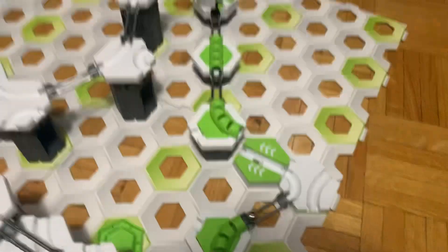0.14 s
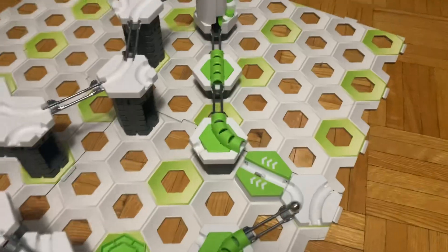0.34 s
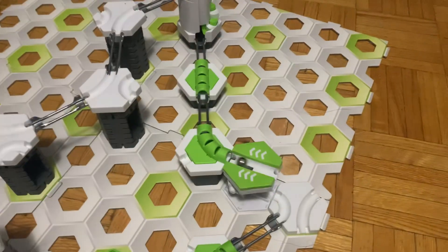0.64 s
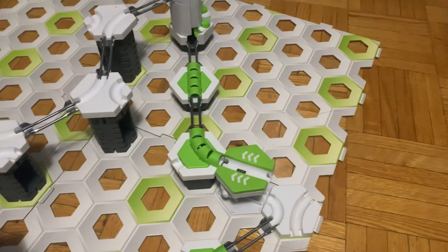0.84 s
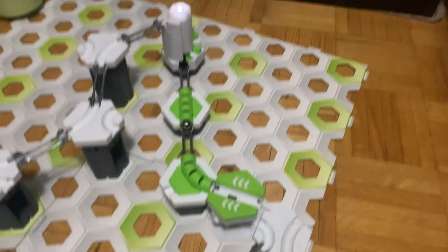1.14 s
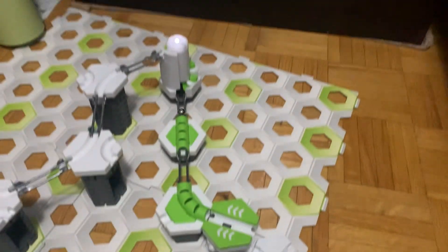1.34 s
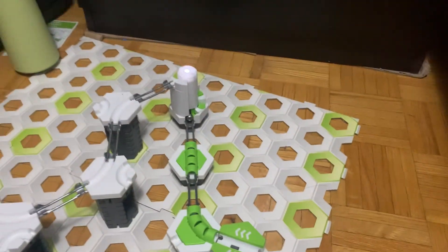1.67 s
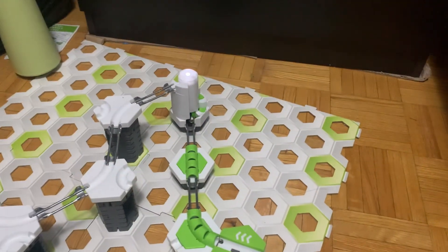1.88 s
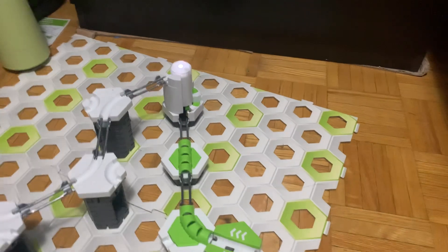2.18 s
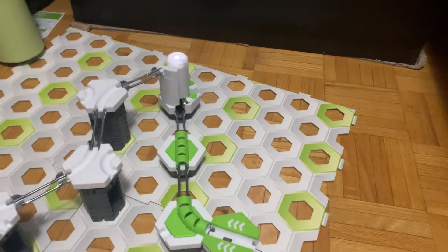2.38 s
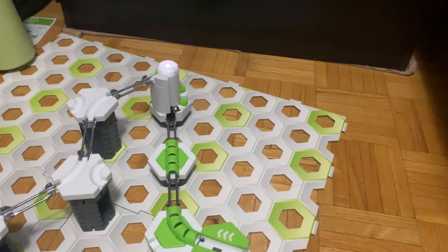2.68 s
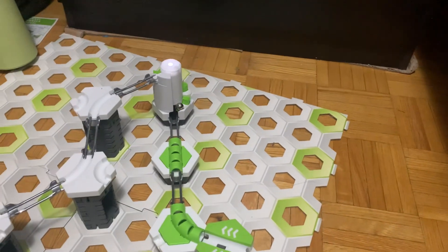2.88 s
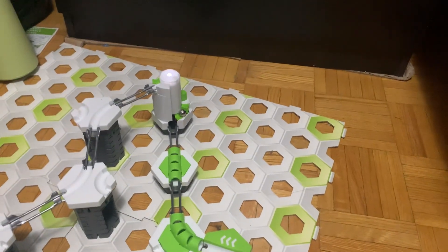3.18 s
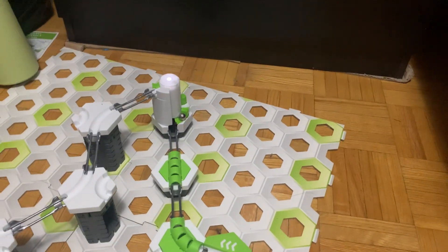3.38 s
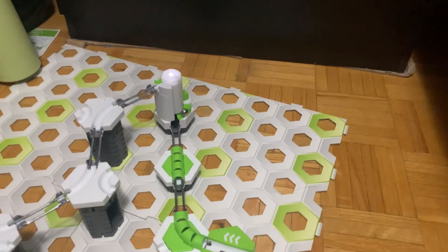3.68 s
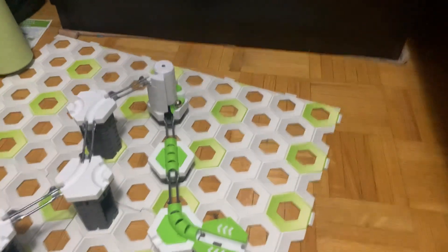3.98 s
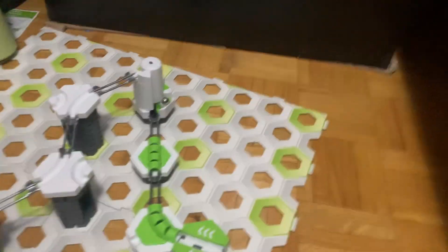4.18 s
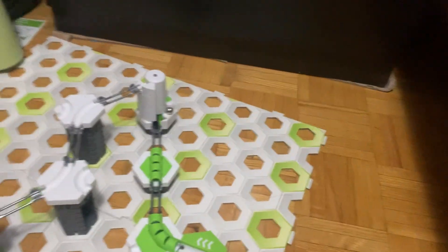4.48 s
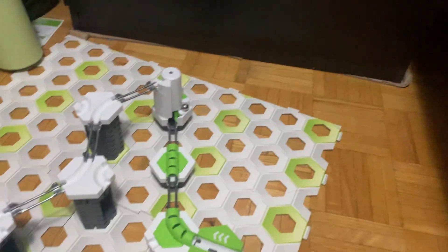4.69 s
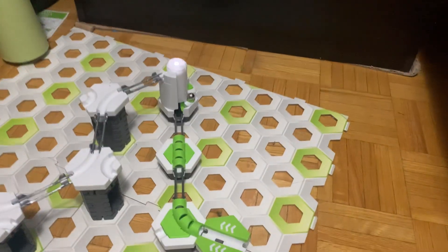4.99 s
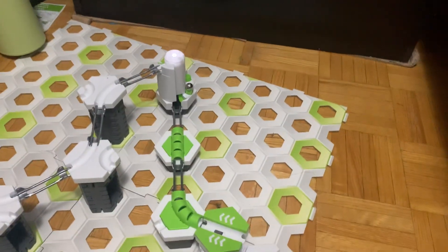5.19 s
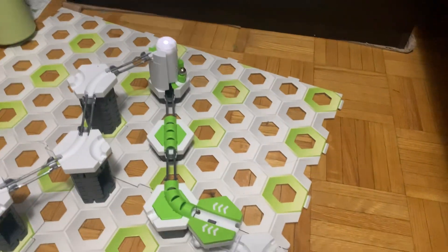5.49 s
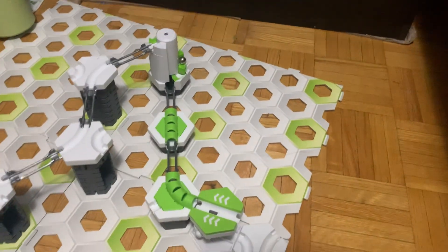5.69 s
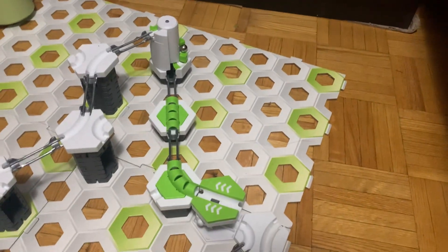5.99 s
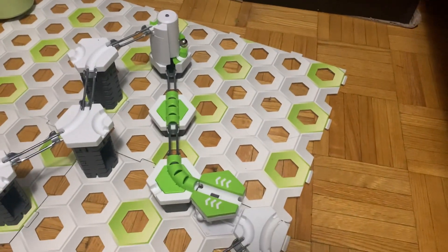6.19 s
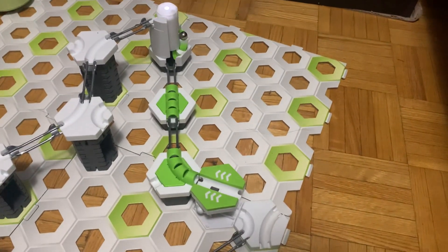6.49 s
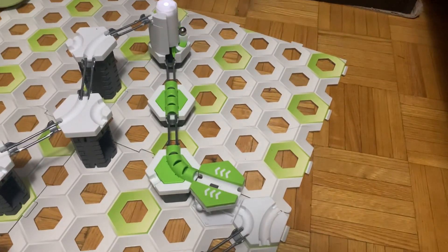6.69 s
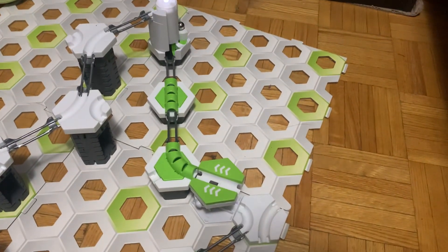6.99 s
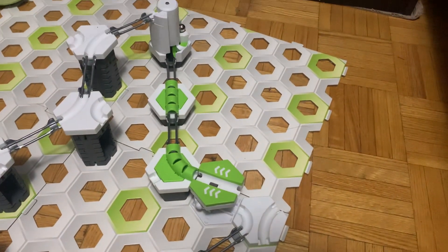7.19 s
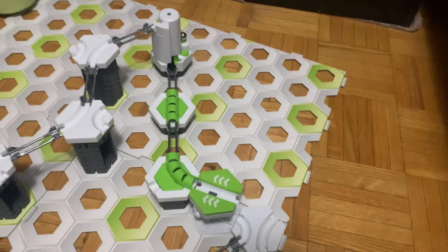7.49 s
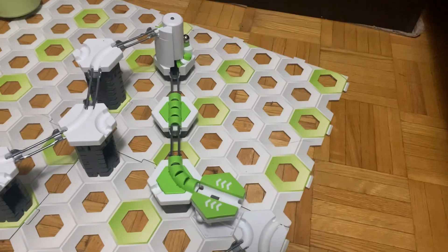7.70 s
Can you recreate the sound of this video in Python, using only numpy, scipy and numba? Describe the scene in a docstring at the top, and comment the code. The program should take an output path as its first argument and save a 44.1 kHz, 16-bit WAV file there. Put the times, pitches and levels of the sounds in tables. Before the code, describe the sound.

A steel marble rattles and clicks along a plastic toy track, knocks into a small motorized lift, which then whirs and scrapes with soft periodic knocks.

```python
"""A quiet living room with a parquet floor, heard through two spaced, hand-held microphones.
A steel marble clicks and rolls along a plastic toy track: chance noise bursts and decaying modes.
It drops into a small battery lift, whose geared motor whirs on: a comb of gear lines and scraping
noise through resonances, slowing under each stroke. The lift knocks softly as the marbles are
pushed up; soft rustles of handling and a low room rumble lie around it."""
import sys
import numpy as np
from scipy import signal
from scipy.fft import rfft, irfft, next_fast_len
from scipy.io import wavfile
from numba import njit

SR = 44100
rng = np.random.default_rng(int(sys.argv[2]) if len(sys.argv) > 2 else 0)


def store_wav(level_fs):
    """Save 16-bit WAV to argv[1]."""
    pcm = np.round(np.clip(np.atleast_2d(level_fs), -1, 1) * 32767)
    wavfile.write(sys.argv[1], SR, pcm.T.astype(np.int16))


N = 345713
TIME = np.arange(N) / SR
# Table levels are relative where the function trims them or levels a whole spectrum to unit rms.


def from_db(db):
    """Decibels to gain."""
    return 10 ** (np.asarray(db) / 20)


def rms_one(x):
    """Scale to unit rms."""
    return x / np.sqrt(np.mean(x ** 2) + 1e-20)


def in_time(rows):
    """Each column of a time table, joined by straight lines."""
    start_s, *columns = np.transpose(rows)
    return [np.interp(TIME, start_s, column) for column in columns]


def gains(points, hz):
    """A spectrum table read as gains on a log-frequency axis."""
    knots_hz, db = np.transpose(points)
    return from_db(np.interp(np.log(hz + 1e-3), np.log(knots_hz), db))


def coloured(x, points):
    """Give a signal the colour of a spectrum table."""
    length = x.shape[-1]
    size = next_fast_len(length)
    hz = np.fft.rfftfreq(size, 1 / SR)
    return irfft(rfft(x, size) * gains(points, hz), size)[..., :length]


def drift(rate):
    """Slow chance curve: normal random knots, rate of them a second, joined by straight lines."""
    knots = rng.standard_normal(int(rate * N / SR) + 2)
    return np.interp(TIME * rate, np.arange(len(knots)), knots)


def swells(rows):
    """Gain of bell-shaped swells, each as long as its length at half height."""
    return sum(from_db(db) * .5 ** ((2 * (TIME - top_s) / length_s) ** 2) for top_s, length_s, db in rows)


def add(out, s, sound):
    """Mix a short sound in at time s."""
    at = max(round(s * SR), 0)
    out[..., at:at + sound.shape[-1]] += sound[..., :N - at]


def struck(modes, age, spread_db):
    """Decaying modes of chance strength and alternating sign; the squared strengths sum to 1."""
    hz, db, t60 = np.transpose(modes)[:, :, None]
    strength = from_db(db + spread_db * rng.standard_normal(hz.shape))
    sign = (-1) ** np.arange(len(hz))[:, None]
    ringing = np.sin(2 * np.pi * hz * age) * from_db(-60 * age / t60)
    return np.sum(sign * strength * ringing, 0) / np.linalg.norm(strength)


def crack(spectrum, age, t60, rise_s):
    """Countless close modes, as coloured noise that swells and dies within milliseconds."""
    swell = 1 - np.exp(-age / rise_s)
    return rms_one(coloured(rng.standard_normal(len(age)), spectrum)) * swell * from_db(-60 * age / t60)


def resonating(x, hz, width_hz):
    """Noise through a fixed resonance with steep skirts; rms 1."""
    edges = np.clip([hz - width_hz / 2, hz + width_hz / 2], 20, .45 * SR)
    return rms_one(signal.sosfilt(signal.butter(2, edges, "band", fs=SR, output="sos"), x))


@njit
def moving_resonance(x, angle, r):
    """Two-pole band-pass whose centre moves."""
    y = np.zeros(len(x))
    for i in range(2, len(x)):
        y[i] = x[i] - x[i - 2] + 2 * r * np.cos(angle[i]) * y[i - 1] - r * r * y[i - 2]
    return y


def singing(noise, hz, width_hz):
    """Rubbing noise twice through a moving resonance, for steep skirts; rms 1."""
    angle, r = 2 * np.pi * hz / SR, np.exp(-np.pi * width_hz / SR)
    return rms_one(moving_resonance(moving_resonance(noise, angle, r), angle, r))


# rumble of the house: pitch_hz [Hz], level_db [dB per Hz]
ROOM_SPECTRUM = [(20, -4), (35, -12), (50, 8.5), (75, 7), (110, -2), (150, -1), (210, -16.5), (310, -13.5),
                 (430, -18.5), (600, -29), (2000, -21.5), (7000, -102), (16000, -63)]
# faint steady hum: pitch_hz [Hz], level_db [dB rms]
HUM_TONES = [(50, -99), (146, -78)]
# the rumble is stronger at first and settles between these two times [s]
RUMBLE_SETTLES_S = (2.2, 2.8)
RUMBLE_EARLY_DB, RUMBLE_LATE_DB = -63, -64


def room_tone(side_db=-11):
    """Low rumble of the house as wide coloured noise, with a faint hum of steady tones."""
    room_db = np.interp(TIME, RUMBLE_SETTLES_S, [RUMBLE_EARLY_DB, RUMBLE_LATE_DB])
    mid, side = rms_one(coloured(rng.standard_normal((2, N)), ROOM_SPECTRUM))
    rumble = mid + from_db(side_db) * side * np.array([[1], [-1]])
    hum = sum(np.sqrt(2) * from_db(db) * np.sin(2 * np.pi * hz * TIME) for hz, db in HUM_TONES)
    return from_db(room_db) * rumble + hum


# the two microphones hear the track unequally: pitch_hz [Hz], left_over_right_db [dB]
MICROPHONE_BALANCE = [(200, 1), (450, -3), (750, -1), (1000, 2.5), (1500, -1), (3000, -1.5), (4300, -3),
                      (5400, -8.5), (6800, -0.5), (16000, 0.5)]
# lead of the left microphone, shaped by the case between the two: pitch_hz [Hz], phase [radians]
LEFT_MICROPHONE_LEAD = [(300, 0), (1000, .9), (1400, -.6), (2000, -.2), (2600, 2.4), (3000, 3.1),
                        (3600, 4.9), (4300, 6.3), (5250, 4.4), (6500, 6.2), (7100, 5.5), (7900, 3.4),
                        (8700, 3), (10700, 0), (11300, -.2), (13400, -3.1), (15400, -6.3)]
# reverberation against the direct sound: pitch_hz [Hz], level_db [dB]
ECHO_SPECTRUM = [(200, 5.5), (1000, 0.5), (2000, -2.5), (4500, -2.5), (7000, -7), (10000, -56.5),
                 (16000, -8)]
ROOM_T60_S = 0.14


def living_room(x, first_echo_s=.003):
    """The direct sound reaches two spaced microphones; a diffuse tail follows, different on each side."""
    age = np.arange(SR // 2) / SR
    tail = rng.standard_normal((2, len(age))) * from_db(-60 * age / ROOM_T60_S) * (age > first_echo_s)
    tail = coloured(tail / np.linalg.norm(tail, axis=1, keepdims=True), ECHO_SPECTRUM)
    size = next_fast_len(N + SR)
    hz = np.fft.rfftfreq(size, 1 / SR)
    lead = np.interp(hz, *np.transpose(LEFT_MICROPHONE_LEAD))
    direct = np.exp(1j * lead * np.array([[1], [0]]))
    balance = gains(MICROPHONE_BALANCE, hz) ** np.array([[.5], [-.5]])
    return irfft(rfft(x, size) * (direct + rfft(tail, size)) * balance, size)[:, :N]


# the holder's hand jostles the microphones: top_s [s], length_s [s], level_db [dB]
JOSTLES = [(0.1, 0.18, -58.5), (1.2, 0.31, -62), (1.7, 0.75, -61), (2.15, .25, -61)]
# colour of the jostling: pitch_hz [Hz], level_db [dB per Hz]
JOSTLE_SPECTRUM = [(15, -5), (30, -2), (48, 13), (80, -8), (160, -23), (400, -53)]


def jostling(rough_db=3):
    """Lumpy low rumble carried through the hand to both microphones."""
    rumble = rms_one(coloured(rng.standard_normal(N), JOSTLE_SPECTRUM))
    return swells(JOSTLES) * from_db(rough_db * drift(6.6)) * rumble


# soft low rustles of handling: top_s [s], length_s [s], level_db [dB]
RUSTLES = [(0.12, 0.099, -70), (1.92, 0.057, -65.5), (2.14, 0.21, -64), (2.38, 0.13, -61.5),
           (2.83, 0.11, -68), (3.55, 0.37, -70.5), (4.03, 0.16, -59.5), (4.57, 0.25, -59.5),
           (5.15, 0.37, -69), (6.02, 0.15, -61)]
# colour of the rustles: pitch_hz [Hz], level_db [dB per Hz]
RUSTLE_SPECTRUM = [(150, -6.5), (230, -8.5), (285, -6), (450, 2), (700, -14), (1300, -4), (2500, -9.5),
                   (6000, -62)]
# faint hollow drone among them: top_s [s], length_s [s], level_db [dB]
DRONES = [(6.15, .45, -71)]
DRONE_HZ, DRONE_WIDTH_HZ = 298, 64


def handling(trim_db=-3, rough_db=3):
    """Soft uneven rustles of noise swell and fade close by, once with a hollow drone."""
    noise = rng.standard_normal(N)
    drone = swells(DRONES) * resonating(noise, DRONE_HZ, DRONE_WIDTH_HZ)
    rustle = rms_one(coloured(noise, RUSTLE_SPECTRUM))
    return drone + swells(RUSTLES) * from_db(trim_db + rough_db * drift(30)) * rustle


# the lift repeats a cycle of two strokes, each beginning with the piston running free: start_s [s]
CYCLE_STARTS_S = [-0.47, 1.967, 4.403, 6.916, 9.45]


def in_cycle(rows):
    """Each column of a table over one lift cycle, repeated for every cycle."""
    cycles = np.interp(TIME, CYCLE_STARTS_S, np.arange(len(CYCLE_STARTS_S)))
    share, *columns = np.transpose(rows)
    return [np.interp(cycles, share, column, period=1) for column in columns]


def meshing(turns, repeating, size=4096):
    """Scraping of gear teeth: one share of its power repeats every turn, the rest is chance."""
    bins = size // 2 + 1
    lines = np.exp(2j * np.pi * rng.random(bins)) * (np.arange(bins) < size // 32)
    pattern = np.interp(turns, np.arange(size) / size, rms_one(irfft(lines)), period=1)
    return np.sqrt(repeating) * pattern + np.sqrt(1 - repeating) * rng.standard_normal(N)


# strong gear lines: multiple of the turning rate [ratio], level_db [dB rms]
GEAR_LINES = [(14, -82), (15, -80.5), (16, -78), (18, -77.5), (20, -82), (21, -74.5), (22, -78), (24, -80),
              (26, -74.5), (28, -73), (30, -88), (32, -69), (34, -66.5), (36, -73.5), (37, -70.5),
              (38, -83), (42, -67.5), (46, -70), (48, -62), (53, -64), (55, -79)]


def gear_whine(turns, weak_line_db=-85, size=4096):
    """The teeth repeat the same pattern on every turn: a comb of lines, a few of them strong."""
    lines = np.zeros(size // 2 + 1)
    lines[19:90] = from_db(weak_line_db)
    for multiple, db in GEAR_LINES:
        lines[round(multiple)] = from_db(db)
    phases = np.exp(2j * np.pi * rng.random(len(lines)))
    one_turn = irfft(lines * phases) * size / np.sqrt(2)
    return np.interp(turns, np.arange(size) / size, one_turn, period=1)


# broad brush hiss: pitch_hz [Hz], level_db [dB per Hz]
BRUSH_SPECTRUM = [(6500, 2), (7800, -25), (8500, 0), (9100, -1), (9600, 23), (10800, 17.5), (11900, 12),
                  (12900, 24), (14100, 17), (14700, 14), (15600, 14)]
# narrow resonances of the hiss: pitch_hz [Hz], width_hz [Hz], level_db [dB],
# gain under full load [dB], gain once the listener has moved [dB]
BRUSH_PEAKS = [(8450, 160, -4.5, -4, -2.5), (9557, 300, -17, 11, -0.5), (10340, 330, -8, 2, -4.5),
               (11310, 300, -9.5, 1, -0.5), (11930, 200, -18, -0.5, 10), (13900, 610, -15.5, -2.5, 8),
               (15800, 500, -16.5, -11, 5.5)]
# the listener moves between these two times [s]
LISTENER_MOVES_S = (3.6, 4.1)


def brush_hiss(load, broad_db=-5, wander_db=3.0):
    """The brushes hiss through narrow resonances, which answer the load unequally and wander in level."""
    peak_noise, broad_noise = rng.standard_normal((2, N))
    moved = np.interp(TIME, LISTENER_MOVES_S, [0, 1])
    peaks = np.zeros(N)
    for hz, width_hz, db, load_db, moved_db in BRUSH_PEAKS:
        level = from_db(db + load_db * load + moved_db * moved + wander_db * drift(4.7))
        peaks += level * resonating(peak_noise, hz, width_hz)
    return peaks + from_db(broad_db) * rms_one(coloured(broad_noise, BRUSH_SPECTRUM))


# a housing resonance buzzes or sings out: top_s [s], length_s [s], level_db [dB], pitch_hz [Hz], width_hz [Hz]
BUZZES = [(1.75, 0.25, -56, 3700, 220), (2.052, 0.26, -58, 4180, 200), (2.264, .2, -55.5, 4620, 300),
          (2.463, 0.16, -58, 5700, 326), (3.22, 0.24, -59, 3690, 200), (3.796, 0.28, -60, 5400, 350),
          (4.327, 0.64, -56.5, 3590, 302), (4.535, 0.17, -55, 4180, 220), (4.762, 0.23, -53.5, 4780, 300),
          (5.303, 1, -60, 5160, 282), (5.622, 0.2, -54, 3740, 220), (5.867, 0.1, -49, 3750, 220),
          (6.06, 0.12, -52, 3770, 150), (6.721, 0.71, -56, 3715, 261), (7.106, 0.12, -55, 3650, 298),
          (7.31, 0.38, -59, 4710, 300), (2.847, 0.43, -51.5, 10570, 450), (3.282, 0.94, -55.5, 12200, 452),
          (4.04, 0.29, -54.5, 9600, 500), (5.497, 0.32, -54, 11200, 1000), (5.752, 1, -59, 11940, 400)]


def housing_buzzes(turns):
    """The scraping of the teeth catches one resonance after another, each in a bell-shaped swell."""
    out, scrape = np.zeros(N), meshing(turns, repeating=0.5)
    for top_s, length_s, db, hz, width_hz in BUZZES:
        near = slice(max(int((top_s - 2 * length_s) * SR), 0), int((top_s + 2 * length_s) * SR))
        bell = .5 ** ((2 * (TIME[near] - top_s) / length_s) ** 2)
        out[near] += from_db(db) * bell * resonating(scrape[near], hz, width_hz)
    return out


# snap of the lift, also its tiny tooth ticks: pitch_hz [Hz], level_db [dB per Hz]
SNAP_SPECTRUM = [(800, -20), (2200, -4), (3900, 8), (5200, -1), (8000, -10), (15000, -8)]


def tooth_ticks(per_s=9, level_db=-47, spread_db=3):
    """Now and then a tooth catches and lets go with a tiny tick of noise."""
    out, age = np.zeros(N), np.arange(SR // 50) / SR
    for start_s in rng.random(int(per_s * N / SR)) * N / SR:
        tick_db = level_db + spread_db * np.clip(rng.standard_normal(), -2, 1)
        add(out, start_s, from_db(tick_db) * crack(SNAP_SPECTRUM, age, t60=0.0094, rise_s=0.0003))
    return out


# a heavy stroke, then a light one, brake the motor: share of the cycle [0-1], turning rate lost [Hz]
BRAKING = [(0, 0), (.072, .3), (.095, 2.7), (.18, 4.8), (.21, 7.3), (.28, 9.7), (.375, 12.3), (.465, 10.8),
           (.527, 7.5), (.584, 1.5), (.615, 4.1), (.66, 5.9), (.79, 7.8), (.855, 5), (.935, .15), (1, 0)]
# rubbing: share of the cycle [0-1], gear rasp level_db [dB], brush hiss level_db [dB]
RUBBING = [(0, -52, -54), (.06, -61.5, -53.5), (.09, -48, -51), (.22, -50.5, -51.5), (.39, -52, -51),
           (.52, -51, -52.5), (.66, -50.5, -51.5), (.9, -49.5, -50.5), (.93, -49, -55.5)]
# ring of the teeth: share of the cycle [0-1], pitch_hz [Hz], level_db [dB]
TOOTH_RING = [(0, 4180, -61.5), (.07, 3970, -55), (.09, 4580, -60), (.13, 4770, -58.5), (.19, 5020, -58),
              (.22, 5120, -58.5), (.45, 5180, -62), (.52, 4700, -67), (.62, 4440, -59), (.70, 4370, -61.5),
              (.77, 5100, -59), (.83, 4730, -62.5), (.87, 4460, -55), (.93, 4150, -61)]
# loudness of the gear lines: share of the cycle [0-1], level_db [dB]
WHINING = [(0, -2.5), (.07, -1), (.095, -0.5), (.2, -2), (.29, -7.5), (.42, -10.5), (.53, -3.5), (.62, -2),
           (.75, -6), (.9, 0)]
# colour of the gear rasp: pitch_hz [Hz], level_db [dB per Hz]
RASP_SPECTRUM = [(300, -12), (620, -14.5), (820, -5), (1200, -7.5), (2000, -11), (2600, -4), (3050, -4),
                 (3400, 0), (3750, 2.5), (4100, -1.5), (5400, 1.5), (5900, -10.5), (7000, 6), (7800, -6),
                 (10000, -45)]
# wall panels of the lift: pitch_hz [Hz], width_hz [Hz], gain_db [dB]
PANELS = [(1303, 26, 2), (1740, 25, -4), (2360, 92, 6), (2740, 50, -8), (3710, 83, -0.5), (5660, 73, 8),
          (6165, 92, 11)]
FREE_HZ, SAG_HZ_PER_S = 87.5, .47  # turning rate without load, and how it sinks as the motor runs on


def lift_motor(flutter=0.00254, once=0.21, twice=0.14, turn_uneven_db=1.3, full_load_hz=4.3,
               teeth_db=-1.5, patchy_db=2.1, rasp_db=-8.5, whine_db=-3.5, waver=0.83, fade_db_per_s=0.24):
    """Each stroke slows the shaft; teeth and brushes rub harder once and twice a turn, and panels ring."""
    lost_hz, = in_cycle(BRAKING)
    gear_db, hiss_db = in_cycle(RUBBING)
    ring_hz, ring_db = in_cycle(TOOTH_RING)
    lines_db, = in_cycle(WHINING)
    speed_hz = FREE_HZ - SAG_HZ_PER_S * TIME - lost_hz
    load = np.minimum(lost_hz / full_load_hz, 1)
    turns = np.cumsum(speed_hz * (1 + flutter * drift(60))) / SR

    pressure = np.exp(once * np.cos(2 * np.pi * turns) + twice * np.cos(4 * np.pi * turns + 1))
    # no two turns rub equally hard
    pressure = pressure * from_db(turn_uneven_db * drift(FREE_HZ))

    # the teeth mesh unevenly, so their ring comes in patches
    teeth_level = from_db(ring_db + teeth_db + patchy_db * drift(11))
    teeth = teeth_level * singing(meshing(turns, repeating=.7), ring_hz, width_hz=520)
    rasp = from_db(gear_db + rasp_db) * rms_one(coloured(meshing(turns, repeating=0.13), RASP_SPECTRUM))
    hiss = from_db(hiss_db) * brush_hiss(load)
    # play in the gears shifts the tooth pattern, so that each line wavers by itself
    wavering = drift(7) * gear_whine(turns) + drift(13) * gear_whine(turns)
    whine = from_db(whine_db + lines_db) * (gear_whine(turns) + waver * wavering)

    fade = from_db(-fade_db_per_s * (TIME - TIME.mean()))
    inside = fade * pressure * (teeth + rasp + hiss) + whine
    panels = np.zeros(N)
    for hz, width_hz, db in PANELS:
        panels += from_db(db) * signal.lfilter(*signal.iirpeak(hz, hz / width_hz, fs=SR), inside)
    running = np.interp(TIME, [1.4, 1.52], [0, 1])
    return running * (inside + panels + tooth_ticks() + pressure * housing_buzzes(turns))


# the lift takes up a marble or ends a stroke: start_s [s], level_db [dB], pitch_hz of the housing [Hz],
# brightness [dB per octave], ringing time [share of the full one]
LIFT_KNOCKS = [(1.488, -23, 1028, -20, 0.95), (1.4934, -22, 1027, -24, 1), (1.529, -32, 1005, -9, 0.54),
               (1.756, -45, 1064, -8, 1), (1.966, -26, 1028, -2, 0.87), (3.186, -38.5, 910, 0, 0.4),
               (3.209, -41.5, 1020, 6, 0.56), (4.402, -30, 1054, 20, 0.67), (5.663, -41.5, 980, 8, 0.56),
               (5.688, -42.5, 1100, 25, 0.42), (6.9167, -27, 1046, 16, 1)]
# lift housing: multiple of its pitch [ratio], level_db [dB], full t60_s [s]
HOUSING_MODES = [(.78, -16, .016), (.9, -1, .018), (1.002, 4, .033), (1.11, -1, 0.021),
                 (1.241, 0.5, 0.0091), (1.36, -8, 0.014), (1.95, -26, 0.016)]
# clack of plastic, in the lift and the track tiles: pitch_hz [Hz], level_db [dB per Hz]
CLACK_SPECTRUM = [(400, -50), (1500, -27), (2300, -1.5), (3200, -3), (4300, -0.5), (5200, -11), (6500, -30),
                  (9000, -27)]


def lift_knocks(trim_db=4, click_db=-19, rebound_s=0.00346, rebound_db=-11):
    """The hollow housing rings briefly with a small click, and the loose piston rebounds once."""
    out, age = np.zeros(N), np.arange(SR // 8) / SR
    multiple, mode_db, t60 = np.transpose(HOUSING_MODES)
    for start_s, db, hz, bright_db, ringing in LIFT_KNOCKS:
        modes = np.transpose([hz * multiple, mode_db + bright_db * np.log2(multiple), t60 * ringing])
        for delay_s, drop_db in ((0, 0), (rebound_s * rng.uniform(0.63, 1.415), rebound_db)):
            click = from_db(click_db) * crack(CLACK_SPECTRUM, age, t60=0.02, rise_s=0.000088)
            knock = struck(modes, age, spread_db=3.0) + click
            add(out, start_s + delay_s, from_db(db + trim_db + drop_db) * knock)
    return out


# heavy blows make the whole plate thud on the parquet: start_s [s], level_db [dB]
THUDS = [(0.043, -53), (0.35, -54), (0.648, -53), (0.734, -37.5), (0.759, -50), (0.92, -44.5), (0.97, -46),
         (1.174, -41), (1.494, -43), (1.53, -47), (1.966, -45.5), (4.402, -51), (6.917, -57.5)]
# colour of the thud: pitch_hz [Hz], level_db [dB per Hz]
THUD_SPECTRUM = [(150, -32), (250, -18), (350, -4), (420, -7), (530, 6), (640, -12), (800, -1), (1500, -45)]
# the mechanism of the lift gives a single dry snap: start_s [s], level_db [dB]
SNAPS = [(1.9655, -45), (4.401, -35.5), (6.9166, -41), (7.2734, -34.5)]


def thuds_and_snaps():
    """The plate's dull thud swells in gently; the lift's snap starts far more sharply. Both are noise bursts."""
    out, age = np.zeros(N), np.arange(SR // 10) / SR
    for start_s, db in THUDS:
        add(out, start_s, from_db(db) * crack(THUD_SPECTRUM, age, t60=0.016, rise_s=0.0021))
    for start_s, db in SNAPS:
        add(out, start_s, from_db(db) * crack(SNAP_SPECTRUM, age, t60=0.015, rise_s=0.0002))
    return out


# rolling marble: start_s [s], level_db [dB]
ROLLING = [(0.0, -57), (0.2, -59.5), (0.56, -61), (0.91, -67), (1.39, -60), (1.62, -70.5), (2.06, -60),
           (2.29, -68.5), (2.6, -72)]
# colour of the rolling: pitch_hz [Hz], level_db [dB per Hz]
ROLL_SPECTRUM = [(300, -13.5), (650, -10), (1050, 4), (1280, 1.5), (1550, 10), (2000, 0), (2500, 4),
                 (3100, -1), (4300, -7), (7000, -24), (15000, -38)]
# the marble rumbles louder through a bend: top_s [s], length_s [s], level_db [dB]
BENDS = [(.375, 0.069, -55.5)]
BEND_HZ, BEND_WIDTH_HZ = 1470, 360


def marble_rolling(bumps_per_s=2500, trim_db=2):
    """Tiny bumps of the rail run into a grainy rumble that dies as the marble settles; a bend rings hollow."""
    rolling_db, = in_time(ROLLING)
    bumps = (rng.random(N) < bumps_per_s / SR) * rng.standard_normal(N)
    moving = np.interp(TIME, [2.4, 2.7], [1, 0])
    straight = moving * from_db(rolling_db + trim_db) * rms_one(coloured(bumps, ROLL_SPECTRUM))
    bend = swells(BENDS) * resonating(bumps, BEND_HZ, BEND_WIDTH_HZ)
    uneven = from_db(3 * drift(170))
    return uneven * (straight + bend)


# marble rattling in the rails: start_s [s], level_db [dB]
RATTLING = [(0.0, -72), (0.2, -64), (0.33, -65), (0.43, -75), (0.52, -50.5), (0.575, -40.5), (0.6, -63),
            (0.63, -54), (0.7, -56), (0.81, -71.5), (1.03, -72), (1.22, -56.5), (1.3, -66), (1.4, -53),
            (1.5, -52)]
# ping of the rail: pitch_hz [Hz], level_db [dB per Hz]
PING_SPECTRUM = [(3500, -38), (5100, -2), (5900, 9), (6800, 13.5), (7600, 11), (9500, -50)]
# hard tick of steel: pitch_hz [Hz], level_db [dB per Hz]
TICK_SPECTRUM = [(5500, -29), (7600, 15), (8600, 15.5), (9400, 12.5), (10600, 11), (11600, 8), (13000, 7.5),
                 (14300, 7), (15500, 4)]


def marble_rattle(touches_per_s=320, trim_db=1.5, rough_db=-0.5, size_spread_db=5):
    """Between the clear contacts the marble jitters against the rails in tiny touches of uneven size."""
    rattle_db, = in_time(RATTLING)
    age, out = np.arange(SR // 25) / SR, np.zeros(N)
    touches = rng.random(N) < touches_per_s / SR
    sizes = touches * from_db(size_spread_db * np.clip(rng.standard_normal(N), -2, 2))
    for spectrum in (CLACK_SPECTRUM, PING_SPECTRUM, TICK_SPECTRUM):
        touch = crack(spectrum, age, t60=0.037, rise_s=0.00049)
        out += signal.oaconvolve(sizes * rng.standard_normal(N), touch)[:N]
    on_track = np.interp(TIME, [1.46, 1.6], [1, 0])
    return on_track * from_db(rattle_db + trim_db + rough_db * drift(110.0)) * rms_one(out)


# the marble strikes rails and tiles: start_s [s], level_db [dB], hardness [dB],
# base plate knock level_db [dB], pitch_hz of the plate at that spot [Hz]
CONTACTS = [(0.0416, -34.5, -13, -29, 1500), (0.0501, -50, 9, -24.5, 1380), (0.0856, -40, 1, -30.5, 1700),
            (0.094, -35.5, -7.5, -37, 1700), (0.164, -38, 1.5, -41, 1530), (0.177, -40, -7.5, -34.5, 1720),
            (0.2023, -53, 6, -41, 1550), (0.2396, -40, -8, -43, 1260), (0.26, -34, -0.5, -33.5, 1510),
            (0.2752, -31, -2.5, -29.5, 1630), (0.286, -41, 4, -38, 1500), (0.3092, -45, -8.5, -29.5, 1670),
            (0.323, -61, -7, -36, 1600), (0.3502, -46, -8, -24, 1600), (0.362, -51, -6, -44, 1500),
            (0.375, -51, -1, -39, 1500), (0.4, -68, -14, -31, 1530), (0.413, -67, -10, -35, 1490),
            (0.4518, -38, 5, -40, 1700), (0.462, -39, 1, -48, 1700), (0.4729, -17.5, 3.5, -47, 2000),
            (0.4874, -26, 12, -57, 2000), (0.4898, -30, -3, -54, 2000), (0.546, -33, 2, -47, 1500),
            (0.5528, -24.5, 4, -33, 1530), (0.5703, -26.5, 6, -50, 1500), (0.581, -35, -1, -47, 1100),
            (0.6033, -31, 4, -43, 1500), (0.611, -32.5, 4, -50, 1500), (0.621, -41, 3, -57, 1500),
            (0.633, -42, 2, -60, 1500), (0.6434, -40, 5, -34.5, 1410), (0.6468, -20.5, 4, -20, 1470),
            (0.6522, -33, -10, -28, 1420), (0.7182, -42, -6, -39, 1400), (0.733, -24.5, 2, -24, 1050),
            (0.7581, -33, 0, -37, 1130), (0.92, -42, -4, -32.5, 1050), (0.955, -44, 1, -40.5, 1220),
            (0.9702, -34, -0.5, -37.5, 1070), (1.054, -43, 0.5, -51, 1390), (1.066, -51, -3, -48, 1400),
            (1.117, -34.5, -2, -40.5, 1150), (1.137, -31.5, -2, -41.5, 1100), (1.1734, -18, -1, -34, 1590),
            (1.1917, -31, -6, -32, 1390), (1.297, -38.5, -9, -36, 1480), (1.327, -28.5, -1.5, -45, 1400),
            (1.3795, -31.5, 0, -55, 1410), (1.3973, -28, 1.5, -44, 1210), (1.433, -30, 0, -45, 1220),
            (1.4614, -24, 3, -37, 1060), (1.473, -49, -1, -42, 1035), (1.488, -20.5, -1.5, -52, 1000),
            (1.4945, -28, 3, -28, 930), (1.529, -25.5, -2, -30, 1000), (1.542, -33.5, 6, -38.5, 1000),
            (1.965, -34, 10, -38, 1050), (4.002, -60, -3, -54, 1330)]
# thin bright ring of the steel rails: pitch_hz [Hz], level_db [dB], t60_s [s]
STEEL_MODES = [(11360, 0, 0.068), (11550, -5, 0.095), (13300, 2, 0.06), (15700, 0.5, 0.023)]
# rails and the small tile inserts: pitch_hz [Hz], level_db [dB], t60_s [s]
PING_MODES = [(5110, -5, 0.025), (6400, -2, 0.052), (6800, -9, 0.037), (6800, -0.5, 0.033),
              (6800, -13, 0.032), (7960, 4, 0.027)]
# track tiles before each is detuned: pitch_hz [Hz], level_db [dB], t60_s [s]
TILE_MODES = [(1790, -23.5, 0.0026), (2400, 2, 0.013), (3773, 3.5, 0.014), (4240, -12, 0.04),
              (4790, 13.5, 0.011), (5320, -5.5, 0.0098)]
# base plate: pitch_hz [Hz], level_db [dB], t60_s [s]
PLATE_MODES = [(566, -19, 0.018), (760, -5, 0.011), (906, 3, 0.022), (1093, 0.5, 0.035), (1220, -4, 0.016),
               (1406, -0.5, 0.011), (1550, -0.5, 0.02), (1724, -3.5, 0.026), (1830, -9.5, 0.016),
               (2310, 9.5, 0.016)]
# dry crack of the plate: pitch_hz [Hz], level_db [dB per Hz]
PLATE_CRACK_SPECTRUM = [(500, -20), (900, 0), (1300, 4.5), (1900, 1.5), (2500, 1), (4000, -36)]
PLATE_REACH_OCTAVES = 0.35  # each spot favours the plate modes near its own pitch


def steel_tick(age, hard_db, steel_db=-18):
    """A hard tick of noise with the thin ring of the steel rails, stronger in a harder contact."""
    ring = from_db(steel_db + .5 * hard_db) * struck(STEEL_MODES, age, spread_db=5.0)
    return crack(TICK_SPECTRUM, age, t60=0.015, rise_s=0.00091) + ring


def rail_ping(age, ring_db=-6):
    """A burst of bright noise with the ringing modes of rail and inserts."""
    ring = from_db(ring_db) * struck(PING_MODES, age, spread_db=10.5)
    return crack(PING_SPECTRUM, age, t60=0.018, rise_s=0.0011) + ring


def tile_clack(age, ring_db=-5, detune=0.096):
    """A plastic clack with short modes, all shifted together to a pitch of its own."""
    this_tile = np.array(TILE_MODES) * [np.exp(detune * rng.uniform(-1.03, 1)), 1, 1]
    ring = from_db(ring_db) * struck(this_tile, age, spread_db=9.5)
    return crack(CLACK_SPECTRUM, age, t60=0.013, rise_s=0.0016) + ring


def plate_knock(age, plate_hz, crack_db=-6):
    """The base plate answers with the modes near the pitch of the struck spot and a dry crack."""
    this_spot = []
    for hz, mode_db, t60 in PLATE_MODES:
        octaves_away = np.log2(hz / plate_hz)
        this_spot.append((hz, mode_db - 6 * (octaves_away / PLATE_REACH_OCTAVES) ** 2, t60))
    dry_crack = crack(PLATE_CRACK_SPECTRUM, age, t60=0.014, rise_s=0.00027)
    return struck(this_spot, age, spread_db=3) + from_db(crack_db) * dry_crack


def marble_contacts(tick_db=1, ping_db=-4.0, clack_db=-2, knock_db=-1, pan_spread_db=3,
                    graze_db=-14, chatter_db=-13, chatter_s=.003, count=2):
    """Each contact ticks, pings, clacks and knocks; a harder one has more tick and less clack."""
    out, age = np.zeros((2, N)), np.arange(SR // 10) / SR
    for start_s, db, hard_db, plate_db, plate_hz in CONTACTS:
        tick = from_db(tick_db + hard_db) * steel_tick(age, hard_db)
        ping = from_db(ping_db) * rail_ping(age)
        clack = from_db(clack_db - hard_db) * tile_clack(age)
        knock = from_db(plate_db + knock_db) * plate_knock(age, plate_hz)
        hit = from_db(db) * (tick + ping + clack) + knock
        hit = hit * from_db(np.array([[.5], [-.5]]) * pan_spread_db * rng.standard_normal())
        add(out, start_s, hit)
        # a grazing touch leads in, light rebounds follow
        add(out, start_s - rng.uniform(0.0006, 0.0044), from_db(graze_db) * hit)
        for k, delay_s in enumerate(np.cumsum(chatter_s * rng.uniform(.4, 3.4, count))):
            add(out, start_s + delay_s, from_db(chatter_db - 12.0 * k) * hit)
    return out


RADIATION_HZ = 477  # small plastic parts give off little sound below this


def scene():
    """Marble, lift and handling sound in the room; jostles reach the microphones directly."""
    high_pass = signal.butter(2, RADIATION_HZ, "high", fs=SR, output="sos")
    blows = signal.sosfilt(high_pass, marble_contacts() + lift_knocks())
    toy = blows + thuds_and_snaps() + marble_rolling() + marble_rattle() + lift_motor()
    return living_room(toy + handling()) + room_tone() + jostling()


CUTOFF_HZ = 15900


def record(dry):
    """The top is cut steeply by an elliptic low-pass."""
    return signal.sosfilt(signal.ellip(10, .2, 80, CUTOFF_HZ, fs=SR, output="sos"), dry)


dry = scene()
out = record(dry)
store_wav(out)
```